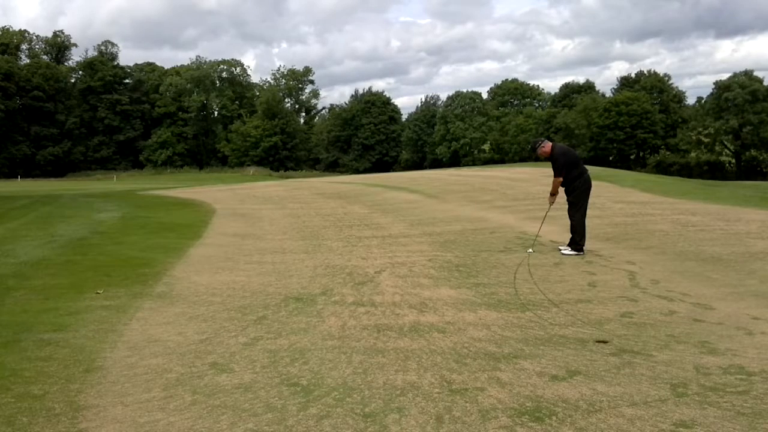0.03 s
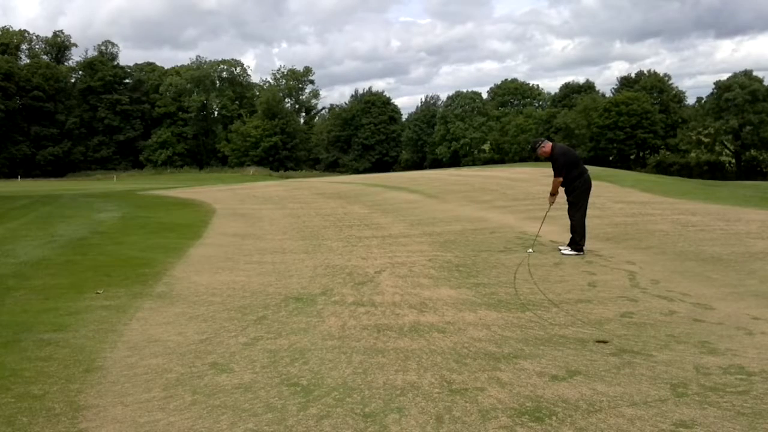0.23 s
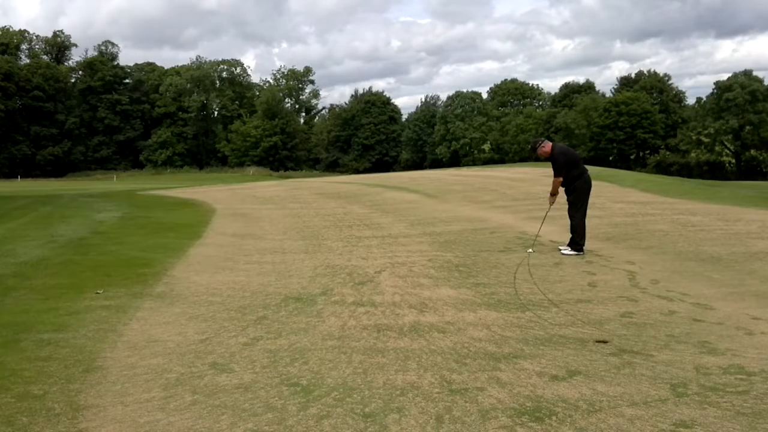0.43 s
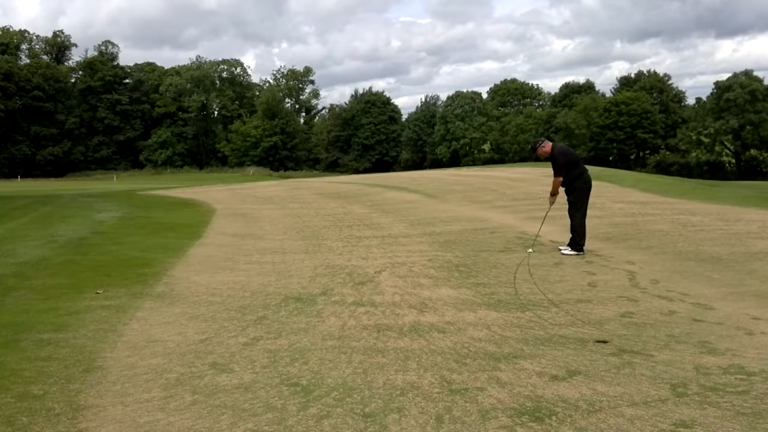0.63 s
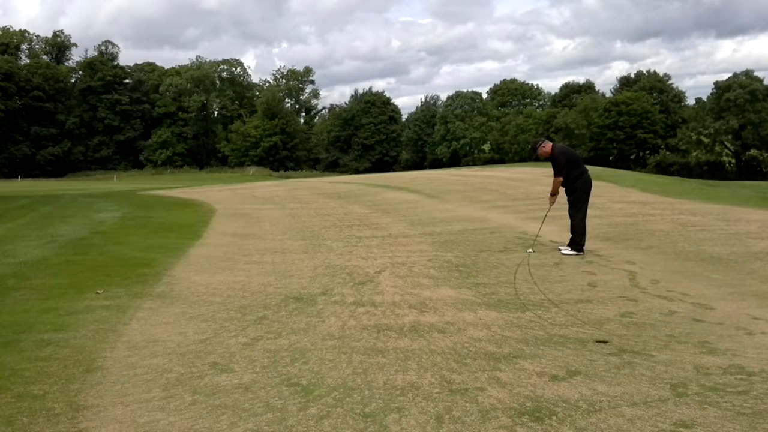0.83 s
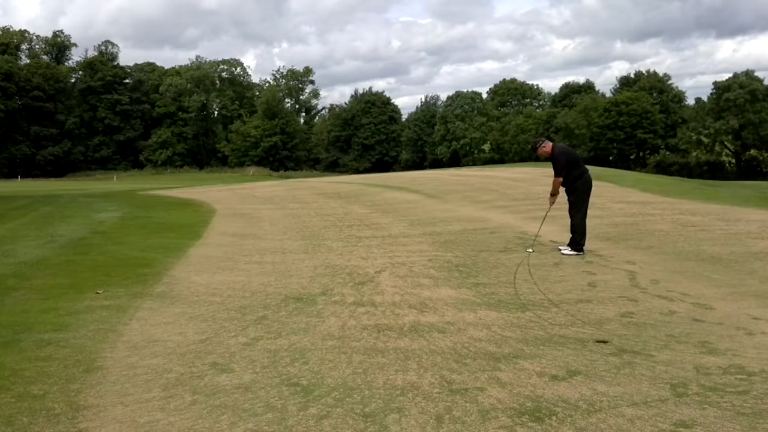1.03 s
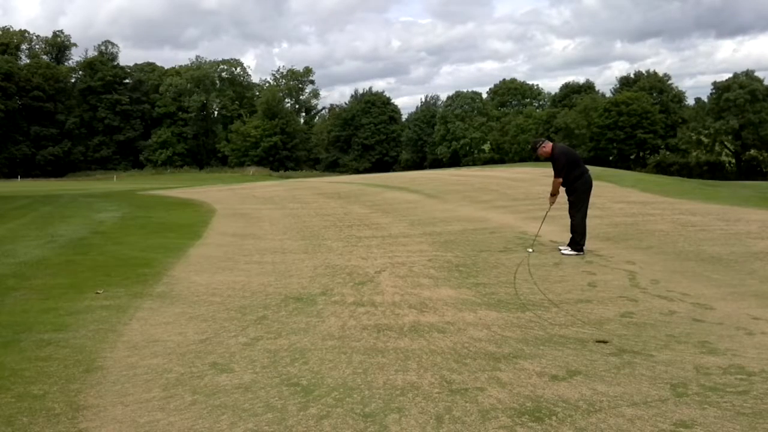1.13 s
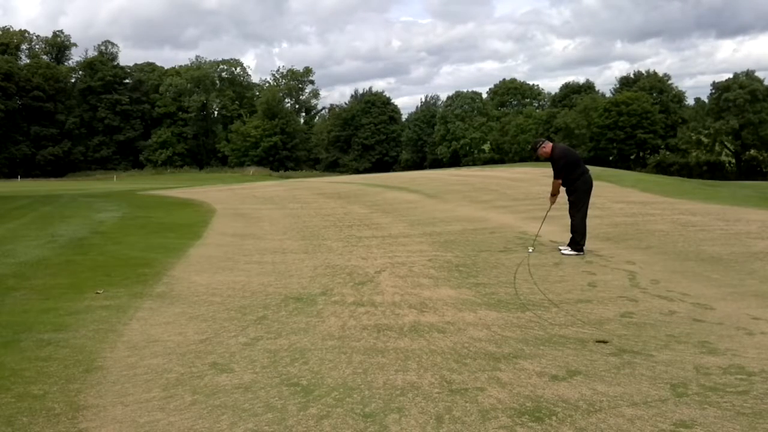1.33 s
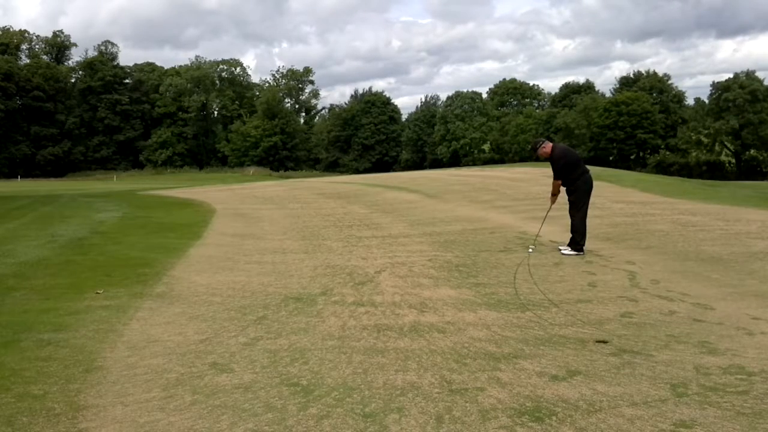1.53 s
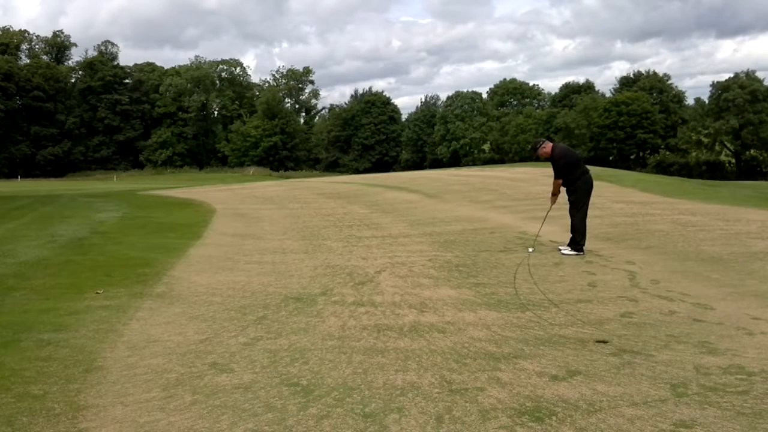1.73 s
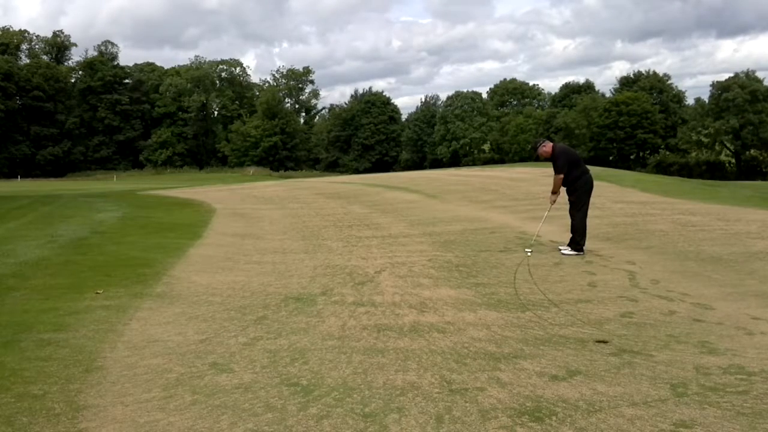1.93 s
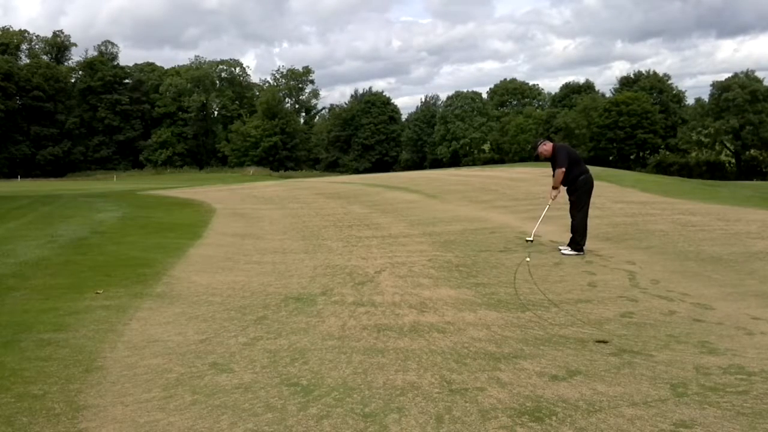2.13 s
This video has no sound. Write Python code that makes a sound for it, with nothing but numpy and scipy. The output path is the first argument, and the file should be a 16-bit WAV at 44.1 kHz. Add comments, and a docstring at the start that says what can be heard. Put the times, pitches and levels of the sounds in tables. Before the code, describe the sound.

Wind buffets the microphone with a low, uneven rumble throughout, over a steady wash of distant traffic and trees. Deep thumps come mostly on the right from about 0.3 to 1.5 seconds, strongest around 1.3 to 1.4. At about 1.9 seconds a putter taps a golf ball once, a short click some metres away. A very faint, far blip follows just after 2 seconds.

```python
"""A putt in the breeze

Distant traffic and trees lay a steady wash behind a golf green. A breeze buffets the microphone,
thrumming in both ports, while eddies thump one port at a time, mostly the right. Near the end a
putter taps the ball once, some metres away, and a faint, far blip follows."""
import sys
import numpy as np
from scipy import signal
from scipy.fft import rfft, irfft
from scipy.io import wavfile

SR = 44100
rng = np.random.default_rng(int(sys.argv[2]) if len(sys.argv) > 2 else 0)


def generate_wav(sig):
    """Save sig (samples, or channels by samples) to the path in sys.argv[1] as 16-bit PCM at SR."""
    pcm = np.round(np.clip(np.atleast_2d(sig).T, -1, 1) * 32767).astype(np.int16)
    wavfile.write(sys.argv[1], SR, pcm)


N = 97020

# Tone of the wash at the left port. Each row: frequency in Hz, relative level in dB.
WASH_TONE = [(20, -11), (60, -4.5), (130, -4), (200, -4.5), (280, -2), (360, -7), (600, -7.8), (800, -3.5),
             (920, -2), (1040, 1), (1200, -2.7), (1400, -4.7), (2000, -8.2), (2500, -19), (3000, -30),
             (3700, -32), (5500, -42), (9500, -45), (15000, -55)]
# How much softer the wash is on the right. Each row: frequency in Hz, cut in dB.
WASH_RIGHT_CUT = [(60, 2), (250, 7), (450, 9), (650, 7.5), (800, 3.5), (1300, 4), (2000, 10.5),
                  (2550, 12.5), (3100, 12), (3800, 9.5), (5500, 3.5), (9500, 5), (14000, -0.5)]
# Stereo width of the wash. Each row: frequency in Hz, likeness of the ports from 0 to 1.
PORT_LIKENESS = [(60, 0.87), (300, 0.91), (750, 0.99), (1300, 0.69), (2200, 0.42), (2700, .08),
                 (3500, 0.17), (6000, 0.026)]
# How far the wash leads on the left. Each row: frequency in Hz, phase lead in radians.
LEFT_LEAD = [(60, 0), (500, 0.46), (1300, 1.04), (2000, 1.7), (2500, 0.99), (2900, -0.75)]
# Slow swell of the leaf hiss on the left. Each row: time in seconds, gain in dB.
LEAF_RIDE = [(0, -2.5), (.28, -0.5), (.4, 0.3), (.95, -.5), (1.2, 1.5), (1.36, -0.5), (1.55, 0.9),
             (1.75, -0.5), (2.2, 0.4)]
# Slow swell of the wash below the leaf hiss. Each row: time in seconds, gain in dB.
BODY_RIDE = [(0, -0.5), (.12, -0.4), (.34, 0.7), (.52, 0.2), (.65, 0.1), (.76, -0.9), (.9, -0.6),
             (1.25, 0.6), (1.44, -0.3), (1.56, -1), (2.02, 0.24), (2.13, 1.7)]
# Extra swell in the low mids of the wash. Each row: time in seconds, gain in dB.
LOW_MID_RIDE = [(0, -1), (.35, 1.4), (.7, 2.3), (1.1, 1.5), (1.25, -3), (1.45, .5), (1.85, -1.5),
                (2.2, -2.5)]
# Buffets on both ports. Each row: centre and length in seconds, relative push and thrum levels in dB.
BUFFET_CUES = [(0.094, 0.056, -43.5, -48.5), (.22, 0.053, -37.5, -44.5), (0.314, 0.046, -39.5, -45.5),
               (0.399, .05, -50, -48), (.458, 0.047, -35, -43), (.505, 0.048, -41, -43),
               (.552, 0.047, -36, -46.5), (0.631, .06, -36, -42.5), (.722, 0.054, -35.5, -42.5),
               (.818, 0.077, -40, -45.5), (0.881, 0.046, -39, -44), (0.946, 0.044, -39.5, -41),
               (1.007, 0.053, -38, -40), (1.077, 0.036, -39.5, -42), (1.141, 0.051, -39, -42),
               (1.203, 0.042, -39.5, -46), (1.249, 0.037, -35.5, -46), (1.478, 0.067, -36.5, -43),
               (1.587, 0.044, -37, -42.5), (1.745, 0.04, -50, -55), (1.794, 0.051, -42.5, -52.5),
               (1.844, 0.047, -35.5, -48.5), (1.905, .06, -36, -41.5), (1.987, .026, -52, -54),
               (2.146, .03, -43.5, -58)]
# A buffet's deep push. Each row: centre in Hz, width in Hz, relative level in dB.
PUSH_TONE = [(28.2, 14, -10), (55, 13.3, -1), (82, 22, -13)]
# The thrum above the push. Each row: centre in Hz, width in Hz, relative level in dB.
THRUM_TONE = [(126, 18.4, -8), (172, 58, -12), (245, 75, -14.5), (418, 230, -25)]
# Eddies. Each row: centre and length in seconds, relative level in dB, pitch in Hz, port as L or R.
EDDY_CUES = [(.315, 0.039, -35.5, 61, "R"), (0.421, 0.081, -38, 49, "R"), (0.55, .026, -28.5, 44.7, "R"),
             (.643, .03, -32, 55, "L"), (0.689, 0.036, -21, 39.4, "R"), (.744, .033, -26, 56, "R"),
             (0.837, 0.041, -25.5, 35.3, "R"), (0.909, 0.063, -30.5, 45, "R"),
             (0.983, .048, -22, 39.7, "R"), (1.028, 0.032, -23, 50.3, "R"), (1.066, 0.046, -32, 38.8, "L"),
             (1.15, 0.078, -30.5, 31.2, "R"), (1.214, 0.028, -26.5, 37.66, "L"),
             (1.32, 0.031, -16.5, 57.2, "R"), (1.37, 0.029, -16.5, 44.6, "R"),
             (1.415, 0.042, -19.5, 59.6, "R"), (1.475, 0.053, -30.5, 49.7, "R")]
# An eddy's thump. Each row: centre and width as multiples of its pitch, relative level in dB.
EDDY_TONE = [(.55, 0.4, -8.5), (1, 0.36, -0.5), (1.7, 0.62, -13), (2.9, 1.45, -21.5), (4.8, 2.6, -28),
             (8.5, 4.6, -39.5)]
# Ring of ball and putter face. Each row: frequency in Hz, relative level in dB, T60 in seconds.
BALL_AND_FACE_MODES = [(1100, -12, 0.004), (2800, -16.5, 0.011), (3640, -15, 0.012), (4400, -28, .005),
                       (5250, -22, 0.0078), (6400, -33, .005), (9800, -29, .006), (11200, -30, .006)]

PORT_DELAY_S = 0.00007  # putt and blip reach the right port this much later


def gain_of(db):
    """Decibels to gain."""
    return 10 ** (np.asarray(db) / 20)


def pan(right_db):
    """Stereo gains that trim the right side only."""
    return gain_of([[0], [right_db]])


def unit_rms(x):
    """Scales to rms 1."""
    return x / np.sqrt(np.mean(x ** 2) + 1e-20)


def decay(age, t60):
    """A fade that falls 60 dB in t60 seconds."""
    return np.exp(-np.log(1000) * age / t60)


def curve_at(points, hz):
    """Reads a table along a log-frequency axis."""
    f, value = np.transpose(points)
    return np.interp(np.log(hz + 1), np.log(f + 1), value)


def drift(shape, widths):
    """Smooth random field of rms 1, with a grain of so many cells along each axis."""
    field = rng.standard_normal(shape)
    for axis, width in enumerate(widths):
        field = field.swapaxes(axis, -1)
        size = field.shape[-1]
        blur = np.exp(-2 * (np.pi * np.fft.rfftfreq(size) * width) ** 2)
        field = irfft(rfft(field) * blur, size).swapaxes(axis, -1)
    return unit_rms(field)


def add(mix, start_s, sound):
    """Mixes a sound in at a time, cut to the ends."""
    start = round(start_s * SR)
    sound = sound[max(-start, 0):]
    part = mix[max(start, 0):][:len(sound)]
    part += sound[:len(part)]


def wash(level_db=-42.5, leaf_hz=3000, low_mid_hz=660, low_mid_octaves=0.79,
         patch_db=1.3, patch_s=0.018, patch_hz=123):
    """Far traffic and trees: a dull bed of noise peaking near 1 kHz, with drifting patches."""
    size, hop = 2048, 512
    frames, hz = N // hop + 5, np.fft.rfftfreq(size, 1 / SR)
    t = np.arange(frames)[:, None] * hop / SR
    a, b, c, d = rng.standard_normal((4, frames, len(hz)))
    left, independent = a + 1j * b, c + 1j * d
    likeness = curve_at(PORT_LIKENESS, hz)
    right = likeness * left + np.sqrt(1 - likeness ** 2) * independent
    right *= np.exp(-1j * curve_at(LEFT_LEAD, hz)) * gain_of(-curve_at(WASH_RIGHT_CUT, hz))
    patches = patch_db * drift(left.shape, [patch_s * SR / hop, patch_hz / hz[1]])
    leaves = np.interp(t, *np.transpose(LEAF_RIDE)) * (hz > leaf_hz)
    swell = np.interp(t, *np.transpose(BODY_RIDE)) * (hz <= leaf_hz)
    low_mid_bell = np.exp(-(np.log2((hz + 1) / low_mid_hz) / low_mid_octaves) ** 2)
    swell += np.interp(t, *np.transpose(LOW_MID_RIDE)) * low_mid_bell
    tone = gain_of(curve_at(WASH_TONE, hz) + swell + patches)
    spectra = np.array([left * gain_of(leaves), right]) * tone
    bed = signal.istft(spectra.swapaxes(1, 2), nperseg=size, noverlap=size - hop)[1][:, :N]
    return gain_of(level_db) * bed / bed[0].std()


def gust(bands, centre, length, level_db, steadiness=0.85, squareness=2.2):
    """One puff of low turbulence in a few bands: its start in seconds and its sound."""
    size = 16384
    t, hz = (np.arange(size) - size / 2) / SR, np.fft.fftfreq(size, 1 / SR)
    swirl = 0
    for middle, width, db in bands:
        detune = (hz - middle) / width
        noise = np.fft.ifft(np.fft.fft(rng.standard_normal(size)) * np.exp(-2 * detune ** 2))
        steady = noise / (abs(noise) + 1e-12) ** steadiness  # compressed, so it follows the puff's shape
        rumble = np.fft.ifft(np.fft.fft(steady) * np.exp(-0.5 * detune ** 2)).real
        swirl += gain_of(db) * unit_rms(rumble)
    puff = np.exp(-abs(2 * t / length) ** squareness)  # above 2: flatter top, steeper sides
    return centre + t[0], gain_of(level_db) * unit_rms(swirl * puff) * np.sqrt(np.mean(puff ** 2))


def buffets(push_trim_db=-1, thrum_trim_db=-0.5):
    """The breeze shakes both ports together: a deep push with a thrum on top."""
    mix = np.zeros(N)
    for centre, length, push_db, thrum_db in BUFFET_CUES:
        add(mix, *gust(PUSH_TONE, centre, length, push_db + push_trim_db))
        add(mix, *gust(THRUM_TONE, centre, length, thrum_db + thrum_trim_db))
    return mix * pan(right_db=2.5)


def eddies(trim_db=0.44):
    """Each eddy catches one port and thumps at its own pitch."""
    ports = np.zeros((2, N))
    for centre, length, db, hz, port in EDDY_CUES:
        bands = [(hz * multiple, hz * width, band_db) for multiple, width, band_db in EDDY_TONE]
        add(ports["LR".index(port)], *gust(bands, centre, length, db + trim_db))
    return ports


def putt(at_s=1.88393, gain_db=-23.5, pulse_s=0.000178, contact_s=0.00018,
         crack_hz=10000, crack_db=-22, scatter_db=-13):
    """One pressure pulse as the ball leaves, a tiny crack and ring, then a faint scatter off the turf."""
    t = np.arange(N) / SR
    since = t - at_s - np.array([[0], [PORT_DELAY_S]])
    widths = since / pulse_s
    pulse = widths * np.exp((1 - widths ** 2) / 2) * pan(right_db=-8.5)
    age = np.maximum(since + 2 * pulse_s, 0)  # ring and crack start on the pulse's leading edge
    ring = sum(gain_of(db) * decay(age, t60) * np.sin(2 * np.pi * hz * age)
               for hz, db, t60 in BALL_AND_FACE_MODES)
    noise = signal.sosfilt(signal.butter(2, crack_hz, fs=SR, output="sos"), rng.standard_normal(N))
    crack = gain_of(crack_db) * noise * decay(age, t60=0.0044)
    attack = 1 - np.exp(-age / contact_s)
    tap = gain_of(gain_db) * (pulse + (ring + crack) * attack * pan(right_db=-15))
    tail = rng.standard_normal((2, N)) * decay(t, t60=0.09)
    scatter = signal.fftconvolve(tap, tail / np.linalg.norm(tail[0]), axes=1)[:, :N]
    return tap + gain_of(scatter_db) * scatter


def blip(at_s=2.041, length_s=0.011, hz=1050, level_db=-38):
    """A faint, short note far away, just above the wash."""
    t = np.arange(N) / SR - at_s - np.array([[0], [PORT_DELAY_S]])
    envelope = np.exp(-(2 * t / length_s) ** 2)
    return gain_of(level_db) * envelope * np.sin(2 * np.pi * hz * t) * pan(right_db=-3)


def scene():
    """Wind up close, the wash behind it, then the putt and a far blip."""
    return buffets() + eddies() + wash() + putt() + blip()


def record(dry):
    """A steep high cut takes off the very top of the treble."""
    high_cut_hz = 15700
    taps = signal.firwin(511, high_cut_hz, window=("kaiser", 9), fs=SR)
    return signal.oaconvolve(dry, taps[None], "same")


dry = scene()
out = record(dry)
generate_wav(out)
```